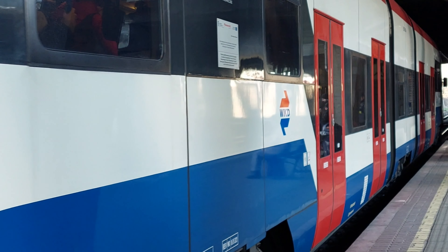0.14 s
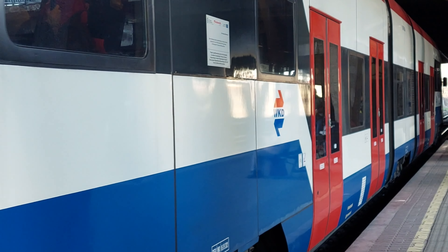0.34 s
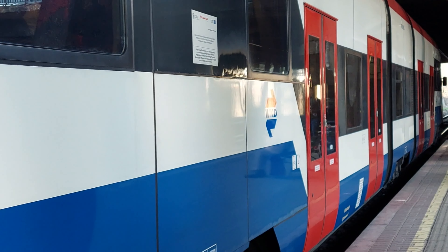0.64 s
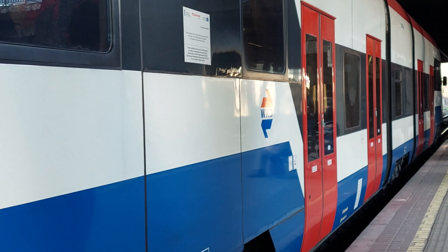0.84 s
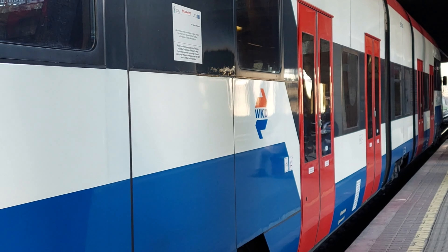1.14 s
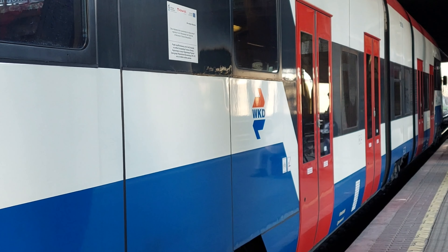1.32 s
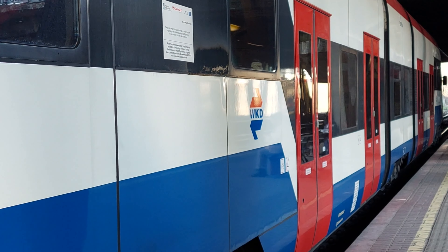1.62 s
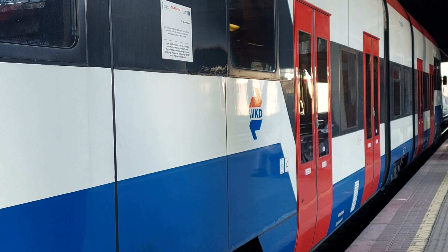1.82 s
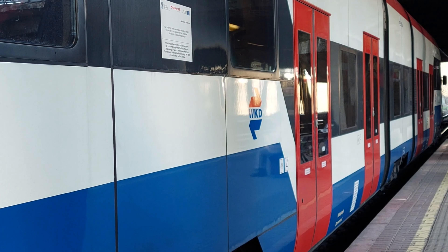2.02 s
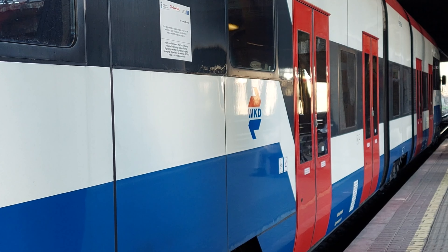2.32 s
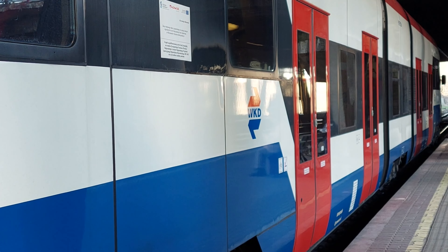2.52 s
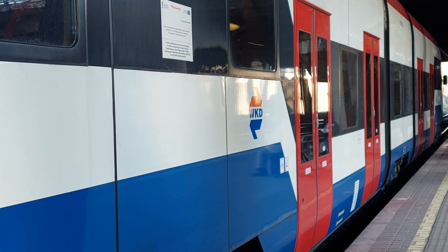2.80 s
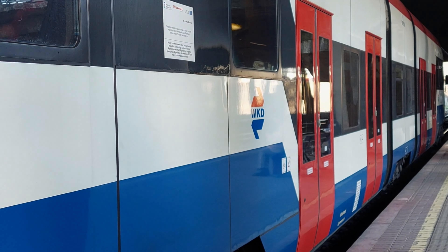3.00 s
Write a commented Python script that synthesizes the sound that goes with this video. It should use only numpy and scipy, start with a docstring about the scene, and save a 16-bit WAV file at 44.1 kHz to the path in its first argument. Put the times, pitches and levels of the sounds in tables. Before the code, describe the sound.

Train brakes squeal piercingly at a platform, fade out, then a low bump and knocks

```python
"""Wheel and brake modes squeal as an electric train stops at a platform: fluttering sines with harmonics.
The motor whine, a sine and its fourth harmonic, sinks over shaped rolling noise. The loudest squeal overloads
the microphone, which bends and clips the wave. Then shaped low noise and swings make a bump, noise bursts and
decaying modes make rattles, knocks and clacks, and faint tones sound over the standing rumble."""
import sys
import numpy as np
from scipy import signal
from scipy.fft import rfft, irfft
from scipy.io import wavfile
from scipy.ndimage import uniform_filter1d

SR = 44100
rng = np.random.default_rng(int(sys.argv[2]) if len(sys.argv) > 2 else 0)


def waveform_to_disk(signal):
    """Save audio, clipped to [-1, 1], as 16-bit WAV at the path in sys.argv[1]."""
    frames = np.transpose(np.atleast_2d(signal))
    scaled = np.clip(frames, -1, 1) * 32767
    samples = np.round(scaled).astype(np.int16)
    wavfile.write(sys.argv[1], SR, samples)


def gain_from_decibels(decibels):
    """Convert decibel values to linear amplitude factors."""
    exponent = np.asarray(decibels, float) / 20
    return 10 ** exponent


N = 138915
TIME_S = np.arange(N) / SR


def evened(x):
    """Scales to rms 1."""
    return x / np.sqrt(np.mean(x ** 2) + 1e-20)


def curve(points, outside=None):
    """Reads a time table at every sample; holds the end values unless given one for outside."""
    s, value = np.transpose(points)
    return np.interp(TIME_S, s, value, outside, outside)


def read_spectrum(points, hz):
    """Reads a spectrum table on a log frequency axis."""
    f, value = np.transpose(points)
    return np.interp(np.log(hz + 1), np.log(f + 1), value)


def sides(pan_db):
    """Left and right gains for a left-over-right level difference, mean 1."""
    right = 2 / (1 + gain_from_decibels(pan_db))
    return np.array([2 - right, right])


def flutter_noise(flutter):
    """Slow complex noise per side, low-passed at a 1 kHz control rate, with rms equal to the flutter share."""
    rolloff_hz, edge_hz, control_hz = 23.8, 240, 1000
    z = rng.standard_normal((2, N * control_hz // SR + 2, 2)) @ [1, 1j]
    rate_hz = np.fft.fftfreq(z.shape[1], 1 / control_hz)
    lowpass = np.exp(-(rate_hz / edge_hz) ** 4) / (1 + (rate_hz / rolloff_hz) ** 2)
    z = np.fft.ifft(z * lowpass)
    z = z / np.sqrt(np.mean(abs(z) ** 2)) * np.clip(flutter, 0, 1)
    control_s = np.arange(z.shape[1]) / control_hz
    return np.array([np.interp(TIME_S, control_s, side) for side in z])


def tone(table, pitch, pan_db, second_db, third_db, flutter):
    """A sine on level and pitch curves, with harmonics and random flutter that partly differs per side."""
    fade_s = 0.0064
    wander_per_hz = 27 / 5000  # pitch wander, before the flutter scaling
    columns = np.transpose(table)
    start_s, end_s = columns[0][0], columns[0][-1]
    level_db = np.interp(TIME_S, columns[0], columns[1])
    if len(columns) > 2:
        pan_db = pan_db + np.interp(TIME_S, columns[0], columns[2])
    # a table starting before 0.03 s sounds from the first sample, with no fade in
    since_start = TIME_S - start_s + (start_s < .03)
    gate = np.clip(np.minimum(since_start, end_s - TIME_S) / fade_s, 0, 1)

    z = flutter_noise(flutter)
    hz = curve(pitch)
    hz = hz * (1 + wander_per_hz * flutter * z[0, ::-1].real)
    phase = 2 * np.pi * (np.cumsum(hz) / SR + rng.random())
    steady = np.sqrt(1 - min(flutter, .99) ** 2)
    mixed = z * [[.85], [.9]] + z[::-1] * [[.2], [.5]]
    z = (steady + mixed) * np.exp(1j * phase)
    second = gain_from_decibels(second_db) * z ** 2 / abs(z)
    third = gain_from_decibels(third_db) * z ** 3 / abs(z) ** 2 * (3 * hz < SR / 2)
    wave = np.sqrt(2) * (z + second + third).real
    return wave * gain_from_decibels(level_db) * gate * sides(pan_db * np.ones(N))


def noise(colour, same, level_db, patchy_db):
    """Stereo noise from random short-time spectra whose level varies in patches of time and frequency."""
    frames, hz = N // 256 + 5, np.fft.rfftfreq(1024, 1 / SR)
    a, b, c, d, patch = rng.standard_normal((frames, 513, 5)).T
    patch = uniform_filter1d(patch, size=16, axis=0)
    patch = evened(uniform_filter1d(patch, size=8, axis=1))
    same = np.clip(read_spectrum(same, hz), -1, 1)[:, None]
    left = a + 1j * b
    right = same * left + np.sqrt(1 - same ** 2) * (c + 1j * d)
    z = np.array([left, right]) * gain_from_decibels(read_spectrum(colour, hz)[:, None] + patchy_db * patch)
    wave = signal.istft(z, nperseg=1024, noverlap=768)[1][:, :N]
    return gain_from_decibels(level_db) * evened(wave)


# Loudest squeal. Each row: time in seconds, level in dB, left over right in dB.
LOUDEST_SQUEAL = [(0.0, -16, 13), (.035, -8, 9), (0.075, -5.5, 8), (0.125, -13, 2), (0.175, -9, 7),
                  (0.212, -19, -2), (0.25, -11, 9), (0.29, -13, 0), (0.32, -9.5, 4.5), (.43, -8.5, 8),
                  (.443, -21, 3), (0.46, -10.5, 8), (0.52, -7.5, 17), (.545, -9, 12), (0.562, -22, 5),
                  (.61, -10, 12), (0.655, -6, 9), (0.7, -11, 5), (.718, -9, 3), (0.73, -22, 0),
                  (.75, -8.5, 8), (.775, -11.5, 8), (0.82, -6.5, 13), (.85, -8.5, 13), (0.89, -7.5, 15),
                  (.93, -11, 10), (0.945, -20, 3), (.96, -11, 10), (1.0, -7.5, 15), (1.06, -9, 14),
                  (1.1, -14, 12), (1.14, -12.5, 16), (1.178, -22, 8), (1.216, -11, 14.5), (1.294, -17, 13),
                  (1.365, -28, 3), (1.414, -20, 11), (1.58, -58, 6)]
# Weaker squeals, one table each. Each row: time in seconds, level in dB.
WEAKER_SQUEALS = [
    [(0.0, -29), (0.146, -30), (0.28, -41), (0.432, -29.5), (0.94, -32), (1.032, -26.5), (1.456, -50),
     (1.6, -61.5)],
    [(0.0, -32), (0.318, -53.5), (0.36, -47)],
    [(0.0, -27.5), (0.112, -24), (0.142, -21.5), (0.25, -29.5), (0.286, -22), (0.512, -28), (0.52, -31)],
    [(0.12, -33), (0.142, -27.5), (0.248, -16), (0.298, -28), (.42, -25), (.48, -38), (.54, -25),
     (.585, -40), (.63, -25), (.67, -37), (.71, -21), (.82, -38), (.86, -24), (.95, -27), (1.01, -38),
     (1.05, -26), (1.1, -36), (1.14, -27), (1.288, -60), (1.348, -55), (1.484, -32), (1.52, -64)],
    [(0.48, -29), (0.632, -25), (0.656, -43), (0.704, -20.5), (0.834, -30), (0.942, -35.5), (1.094, -48),
     (1.16, -46)],
    [(1.17, -46), (1.256, -33), (1.54, -55)],
    [(1.2, -31.5), (1.46, -34.5), (1.56, -45)],
    [(0.0, -21.5), (0.06, -34.5), (0.2, -28.5), (0.422, -43), (0.454, -53), (0.5, -30)],
    [(.05, -45), (.1, -30), (.27, -44), (.33, -30), (.53, -42), (.567, -20), (.6, -40), (.72, -34),
     (.8, -46)],
    [(0.25, -75), (0.274, -52), (1.032, -40), (1.106, -60.5), (1.258, -46.5), (1.5, -64)],
]
# Pitch of the loudest and each weaker squeal, one table each. Each row: time in seconds, pitch in Hz.
SQUEAL_PITCHES = [
    [(0, 6684), (.45, 6691), (.8, 6685), (1.2, 6684), (1.6, 6672)],
    [(0, 4835), (.2, 4900), (.6, 4872), (.7, 4895), (1.6, 4903)],
    [(0, 4800), (.15, 4770), (.36, 4730)],
    [(0, 5565), (.2, 5550), (.5, 5600)],
    [(.12, 5520), (.24, 5462), (.33, 5530), (.42, 5470), (.5, 5505), (1.5, 5515)],
    [(.48, 5610), (.51, 5720), (.58, 5630), (.62, 5720), (.66, 5690), (.8, 5715), (.85, 5760), (1.16, 5800)],
    [(1.17, 5850), (1.54, 5868)],
    [(1.2, 5075), (1.3, 5092), (1.4, 5120), (1.55, 5200)],
    [(0, 6380), (.5, 6372)],
    [(0, 6535), (.8, 6495)],
    [(.25, 8486), (1, 8468)],
]
# Loudest, then weaker squeals. Each row: left over right in dB (added to any in the squeal's table),
# 2nd harmonic in dB re fundamental, 3rd harmonic in dB re fundamental, flutter share 0-1.
SQUEAL_VOICES = [(0, -31, -90, 0.18), (3, -21.5, -29, 0.4), (3, -4.5, -25, 0.8), (3, -11, -52, 0.8),
                 (3, -19.5, -51, 0.45), (3, -14.5, -58, 0.5), (3, -27.5, -50, .3), (3, -14, -16, 0.42),
                 (3.002, -32.5, -77, .5), (3.001, -16.5, -73, .7), (3, -60.5, -80, 0.5)]


def squeals():
    """Self-excited wheel and brake modes, each a fluttering tone on its own level and pitch curves."""
    levels = [LOUDEST_SQUEAL] + WEAKER_SQUEALS
    return sum(tone(table, pitch, *voice)
               for table, pitch, voice in zip(levels, SQUEAL_PITCHES, SQUEAL_VOICES))


# Each row: start in seconds, end in seconds, starting level in dB.
FAINT_PARTIALS = [(0, 0.16, -50), (0.58, 1.2, -51.5), (0.021, 0.32, -40.5), (0.01, .6, -43),
                  (0.34, 1.3, -56.5), (0, 0.405, -45), (0.046, 0.88, -47.5), (0.0057, 0.45, -60),
                  (0.085, 0.41, -40.5)]
# Pitch of each faint partial, same order. One column: pitch in Hz.
FAINT_PARTIAL_HZ = [4463, 6175, 9512, 10304, 10541, 11946, 13190, 14142, 10923]


def faint_partials():
    """Faint patchy partials: tones at full flutter, each sinking 1 dB."""
    return sum(tone([(start, db), (end, db - 1)], [(0, hz)], 4, -81.5, -81, 1)
               for (start, end, db), hz in zip(FAINT_PARTIALS, FAINT_PARTIAL_HZ))


# Motor whine. Each row: time in seconds, level in dB (of the fundamental).
WHINE_LEVEL = [(0.0, -33), (0.214, -26), (0.44, -28), (0.5, -34.5), (0.664, -36.5), (0.748, -29.5),
               (.95, -36.5), (1.08, -52)]
# Falls with speed. Each row: time in seconds, pitch of the fundamental in Hz.
WHINE_PITCH = [(0, 777), (.4, 752), (.75, 731), (1.12, 718)]


def motor_whine():
    """Motor tone and fourth harmonic falling with speed; the right side hears them later."""
    fourth_db, right_lag_samples = -18.5, 15
    whine = tone(WHINE_LEVEL, WHINE_PITCH, 2.2, -93, -93, 0.38)
    fourth_pitch = np.array(WHINE_PITCH) * [1, 4]
    whine += gain_from_decibels(fourth_db) * tone(WHINE_LEVEL, fourth_pitch, 1, -90, -90, .8)
    return np.array([whine[0], np.roll(whine[1], right_lag_samples)])


# Rolling and fans. Each row: frequency in Hz, relative density in dB per Hz.
ROLL_COLOUR = [(12, -7), (20, 8), (101, -13.5), (142, -1), (177, -8), (216, -5.5), (301, -20.5), (337, -34),
               (388, -11), (558, -21.5), (1710, -27.5), (1960, -27.5), (3440, -30.5), (4540, -37.5),
               (9400, -53), (16000, -53.5)]
# Each row: frequency in Hz, left-right likeness from -1 to 1.
ROLL_LIKENESS = [(60, 0.86), (120, 0.76), (240, 0.82), (480, -0.41), (950, -0.14), (1890, -0.13),
                 (3770, -0.055), (7520, -0.11), (15000, 1)]
# Rolling rumble. Each row: time in seconds, gain in dB.
ROLL_BASS_GAIN = [(0, -0.5), (.8, -1), (1.2, -1.5), (2, 0.5)]
# Rolling hiss above the bass, sinking with speed. Each row: time in seconds, gain in dB.
ROLL_HISS_GAIN = [(0, 5.5), (.5, 4), (1.5, 4), (1.9, 2.5)]
# Further drop of the hiss at the stop. Each row: time in seconds, gain in dB.
STOP_HISS_GAIN = [(1.915, 0), (1.925, -7), (1.96, -8), (1.99, -30)]
# Standing train. Each row: frequency in Hz, relative density in dB per Hz.
REST_COLOUR = [(12, -19), (20, -0.5), (146, -8), (193, -10.5), (319, -14), (388, -19.5), (485, -19),
               (590, -27), (642, -24), (2750, -33.5), (3340, -35.5), (4810, -40), (16000, -54)]
# Each row: frequency in Hz, left-right likeness from -1 to 1.
REST_LIKENESS = [(60, 0.9), (130, 1), (290, -0.03), (640, -0.11), (1410, -0.22), (3100, 0.073),
                 (6820, -0.54), (15000, 1)]


def background():
    """Rolling noise, split into bass and hiss, gives way to the standing noise at the stop."""
    stop_s, crossfade_s, split_hz = 1.96, 0.01, 380
    roll = noise(ROLL_COLOUR, ROLL_LIKENESS, -30.5, 0.77)
    rest = noise(REST_COLOUR, REST_LIKENESS, -29.5, 1.67)
    bass = signal.sosfiltfilt(signal.butter(2, split_hz, fs=SR, output="sos"), roll)
    hiss = (roll - bass) * gain_from_decibels(curve(ROLL_HISS_GAIN) + curve(STOP_HISS_GAIN))
    after = np.clip((TIME_S - stop_s) / crossfade_s, 0, 1)
    return bass * (1 - after) * gain_from_decibels(curve(ROLL_BASS_GAIN)) + hiss + rest * after


# One brief squeak. Each row: time in seconds, level in dB.
CHIRP_LEVEL = [(1.055, -58), (1.075, -11), (1.095, -48)]


def chirp():
    """A brief, nearly steady tone swelling and fading at one pitch."""
    return tone(CHIRP_LEVEL, [(0, 6815)], 2.7, -98, -90, 0.056)


# Low bump and shudder. Each row: time in seconds, gain in dB.
BUMP_GAIN = [(1.9, -36), (2.035, -11), (2.088, -17), (2.124, -15.5), (2.54, -33), (2.72, -27), (2.8, -43)]
# Each row: frequency in Hz, relative density in dB per Hz.
BUMP_COLOUR = [(8.8, -18), (15, 13.5), (64, -20), (112, -8.5), (147, -22), (275, -21.5), (334, -32),
               (606, -41), (700, -35.5), (910, -80), (1540, -120)]
# Low swings. Each row: start in seconds, pitch in Hz, length in cycles, peak level in dB,
# phase in radians.
LOW_SWINGS = [(1.932, 17.7, 2.3, -14, 2.9), (2.006, 109.8, 7.4, -14.5, 2.1),
              (2.122, 122.6, 11.5, -25.5, 0.1), (2.598, 120.6, 3.9, -21.5, 0.1)]


def low_bump():
    """A low bump and shudder: lumpy low noise and sine swings under half-sine envelopes."""
    lumps = noise(BUMP_COLOUR, [(20, 0.93), (700, 0.96)], -7.5, 1.3)
    out = lumps * gain_from_decibels(curve(BUMP_GAIN, -90))
    for start, hz, cycles, db, phase in LOW_SWINGS:
        progress = np.clip((TIME_S - start) * hz / cycles, 0, 1)
        swing = np.sin(2 * np.pi * hz * (TIME_S - start) + phase)
        out += gain_from_decibels(db) * np.sin(np.pi * progress) * swing
    return out


# Rattles and knocks. Each row: start in seconds, level in dB, left over right in dB, centre in Hz,
# panel ring in dB re the level.
KNOCK_HITS = [(1.961, -34.5, -2, 9200, -19), (1.992, -26.5, 1, 1810, -16.5), (2.001, -24.5, -8, 600, -0.5),
              (2.033, -30.5, 0, 4000, -17), (2.043, -28, 3, 620, 3), (2.08, -35, -1, 1170, 9),
              (2.094, -35.5, 0, 10300, -18), (2.124, -31, 1, 3130, 3.5), (2.19, -39, 0, 9100, -3),
              (2.263, -37, -2, 2030, -10), (2.565, -30.5, 2, 2440, -16), (2.662, -40, 2, 4900, -19.5),
              (2.711, -29, 5, 1180, -20.5), (2.885, -44, 4, 4520, -15.5), (2.955, -40, -4, 10000, -19),
              (3.019, -40, -4.5, 10000, -23), (3.085, -41.5, -7, 10000, -29)]
# Panel modes. Each row: pitch in Hz, relative level in dB, 60 dB decay in seconds (halved in clatter).
PANEL_MODES = [(610, 0, .06), (830, -4, .05), (1170, -2, .06), (1560, -6, .04), (1950, -8, .03),
               (2450, -10, .03)]


def knocks():
    """Each knock is a decaying soft band of noise plus short panel modes, weaker far from its centre."""
    burst_octaves, burst_t60_s, burst_rise_s = 0.85, .1, .005
    mode_fall_db_per_octave, mode_spread_db, mode_detune = 11.5, 2, 0.016
    size = 8192
    out, t, hz = np.zeros((2, N + size)), np.arange(size) / SR, np.fft.rfftfreq(size, 1 / SR)
    for start, db, pan_db, centre_hz, ring_db in KNOCK_HITS:
        v = rng.standard_normal((3, size))
        octaves = np.log2((hz + 1) / centre_hz)
        band = np.exp(-.5 * (octaves / burst_octaves) ** 2)
        burst = evened(irfft(rfft(v[0] + 0.95 * v[1:]) * band))  # sides share v[0]
        burst *= gain_from_decibels(-60 * t / burst_t60_s) * np.minimum(t / burst_rise_s, 1)
        ring = np.zeros(size)
        for k, (f, mode_db, t60_s) in enumerate(PANEL_MODES):
            fall_db = mode_fall_db_per_octave * abs(np.log2(f / centre_hz))
            level_db = mode_db + mode_spread_db * v[1, k] - fall_db - 60 * t / t60_s
            ring += gain_from_decibels(level_db) * np.sin(2 * np.pi * f * t * (1 + mode_detune * v[0, k]))
        hit = 0.53 * burst + gain_from_decibels(ring_db) * ring / abs(ring).max()
        at = round(start * SR)
        out[:, at:at + size] += gain_from_decibels(db) * hit * sides(pan_db)[:, None]
    return out[:, :N]


# Loose parts rattle after the bump. Each row: time in seconds, level in dB.
CLATTER_LEVEL = [(1.969, -47), (1.995, -32), (2.06, -39.5), (2.15, -50), (2.3, -59.5)]


def clatter():
    """Loose parts: dense random taps, each exciting the panel modes and a low-passed noise grain."""
    taps_per_s, grain_t60_s = 190, 0.016
    t = np.arange(2000) / SR
    strength_db = 3 * np.minimum(rng.exponential(1, (2, N)), 3)
    taps = (rng.random((2, N)) < taps_per_s / SR) * gain_from_decibels(strength_db)
    grain = .5 * signal.lfilter([1], [1, -.88], rng.standard_normal(2000)) * gain_from_decibels(-60 * t / grain_t60_s)
    for f, db, t60_s in PANEL_MODES:
        grain += gain_from_decibels(db - 1 - 120 * t / t60_s) * np.sin(2 * np.pi * f * t)  # decays in half t60_s
    rattle = evened(signal.oaconvolve(taps, grain[None])[:, :N])
    return rattle * gain_from_decibels(curve(CLATTER_LEVEL, -120))


# Faint electrical tone at rest. Each row: time in seconds, level in dB.
WHISTLE_LEVEL = [(2.11, -66), (2.13, -61), (2.25, -67), (2.37, -76), (2.55, -68), (2.65, -56), (3.0, -55),
                 (3.15, -67)]


def whistle():
    """Electrical tone at one mean pitch with a little flutter."""
    return tone(WHISTLE_LEVEL, [(0, 4753)], 0, -89.5, -93, 0.34)


# Short squeaks at rest. Each row: start in seconds, end in seconds, level in dB, pitch in Hz.
ROUGH_SQUEAKS = [(2.39, 2.45, -58, 4820), (2.478, 2.505, -51, 4800), (2.478, 2.505, -55, 4500)]


def rough_squeaks():
    """Short tones made rough by strong flutter."""
    return sum(tone([(start, db), (end, db)], [(0, hz)], 0, -90, -89.5, 0.93)
               for start, end, db, hz in ROUGH_SQUEAKS)


# A small motor speeds up. Each row: time in seconds, level in dB.
SPIN_UP_LEVEL = [(2.55, -49.5), (2.75, -52), (3.15, -46)]
# Each row: time in seconds, pitch in Hz.
SPIN_UP_PITCH = [(2.55, 413.6), (3.15, 563)]


def spin_up():
    """Small motor: a rising tone with a strong second harmonic."""
    return tone(SPIN_UP_LEVEL, SPIN_UP_PITCH, 0, -4.5, -89.5, 0.58)


# Hard clacks. Each row: start in seconds, peak level in dB.
CLACK_HITS = [(2.571, -33), (2.7078, -19)]
# Each row: pitch in Hz, relative level in dB, 60 dB decay in seconds.
METAL_MODES = [(650, -4, .05), (790, 0, .06), (1450, -2, .045), (1700, -3, .03), (1880, -3, .04),
               (2200, -8, .03)]


def clacks():
    """Hard metal contacts: short modes struck at once."""
    rise_s, size = .002, 4096
    out, t = np.zeros(N + size), np.arange(size) / SR
    ring = sum(gain_from_decibels(db - 60 * t / t60_s) * np.sin(2 * np.pi * f * t) for f, db, t60_s in METAL_MODES)
    ring *= np.minimum(t / rise_s, 1)
    for start, db in CLACK_HITS:
        out[round(start * SR):][:size] += gain_from_decibels(db) * ring / abs(ring).max()
    return out[:N]


def scene():
    """Sums the squealing train, the bump with its rattles, and the faint sounds at rest."""
    train = squeals() + faint_partials() + motor_whine() + background() + chirp()
    bump = low_bump() + knocks() + clatter()
    standing = whistle() + rough_squeaks() + spin_up() + clacks()
    return train + bump + standing


def low_pass(x):
    """Removes everything above the highest recorded frequency."""
    return signal.sosfilt(signal.butter(12, 20000, fs=SR, output="sos"), x)


def record(dry):
    """Microphone bends the treble into sum and difference tones; the input clips, then is band-limited."""
    square_db, cube_db, ceiling, edge_hz = -22.5, -24, 1.01, 15800
    treble = signal.sosfilt(signal.butter(4, 3500, "high", fs=SR, output="sos"), dry)
    bent = gain_from_decibels(square_db) * treble ** 2 - gain_from_decibels(cube_db) * treble ** 3
    bent = signal.sosfilt(signal.butter(4, 7000, "high", fs=SR, output="sos"), bent)
    clipped = np.clip(dry + bent, -ceiling, ceiling)
    lowpass = signal.firwin(301, edge_hz, window=("kaiser", 9), fs=SR)[None]
    mix = signal.oaconvolve(clipped, lowpass, "same")
    return low_pass(mix)


dry = scene()
out = record(dry)
waveform_to_disk(out)
```